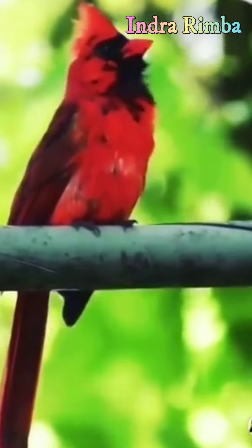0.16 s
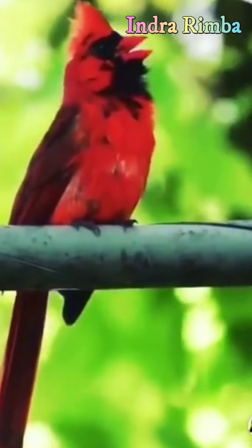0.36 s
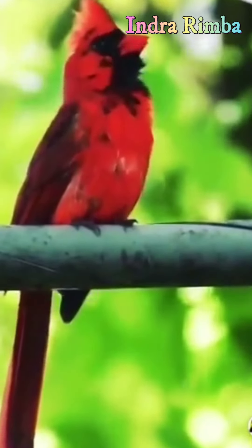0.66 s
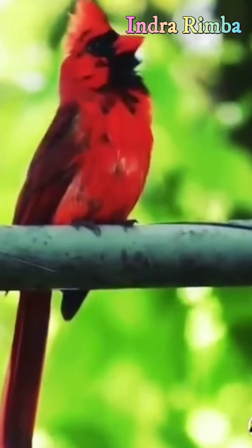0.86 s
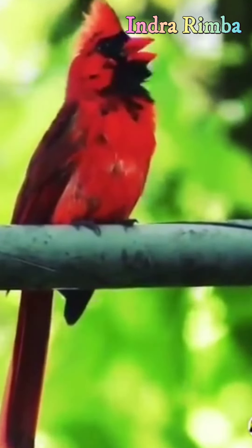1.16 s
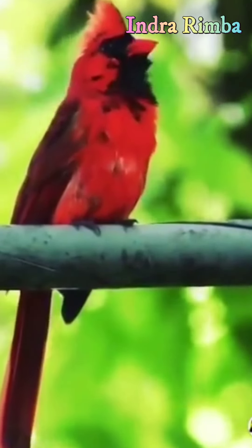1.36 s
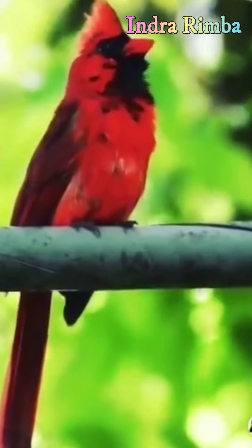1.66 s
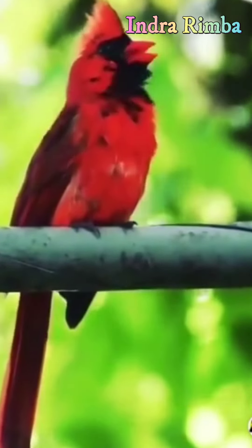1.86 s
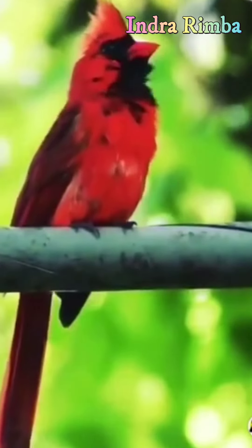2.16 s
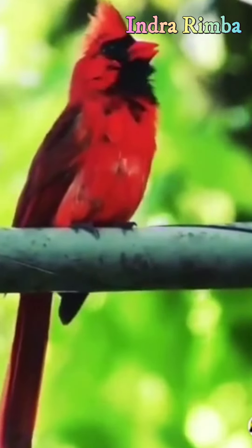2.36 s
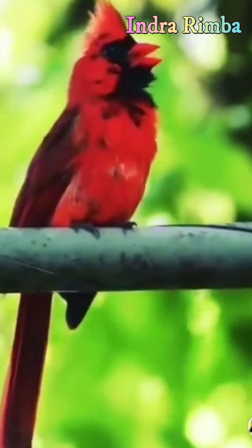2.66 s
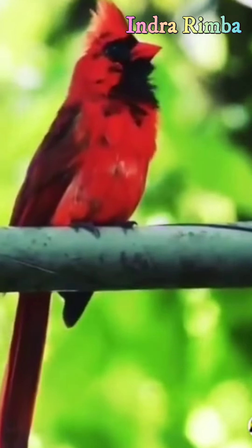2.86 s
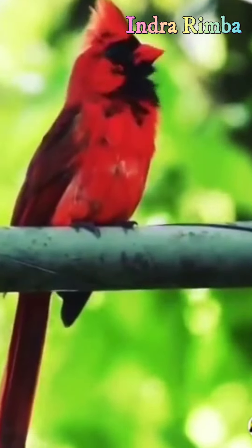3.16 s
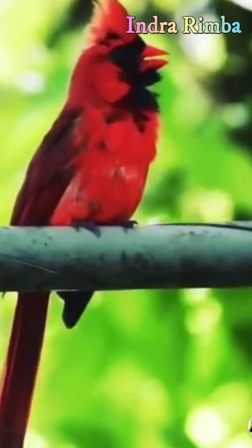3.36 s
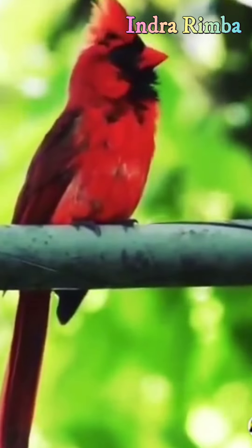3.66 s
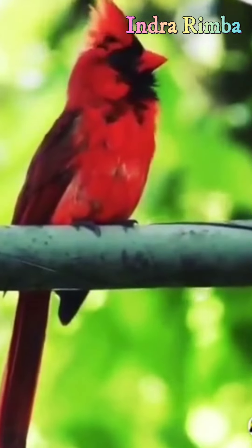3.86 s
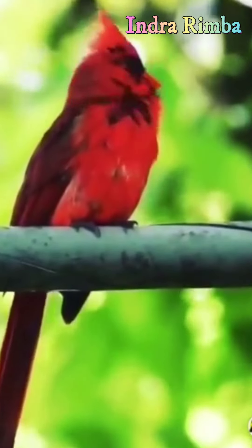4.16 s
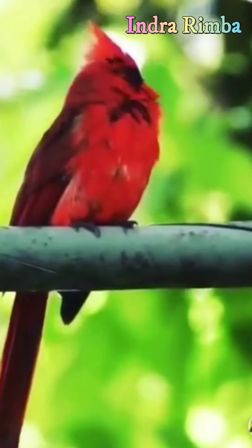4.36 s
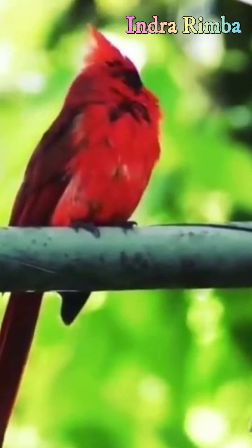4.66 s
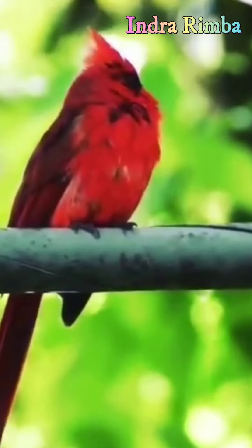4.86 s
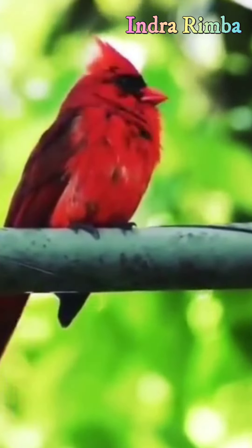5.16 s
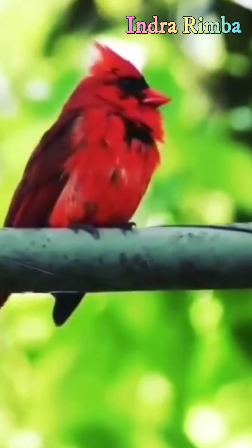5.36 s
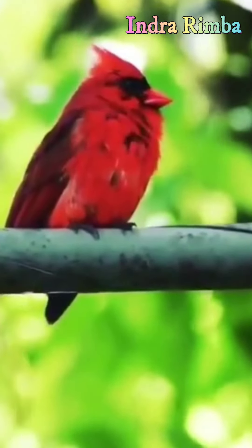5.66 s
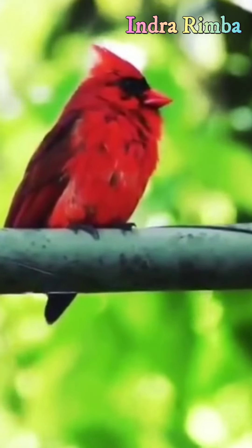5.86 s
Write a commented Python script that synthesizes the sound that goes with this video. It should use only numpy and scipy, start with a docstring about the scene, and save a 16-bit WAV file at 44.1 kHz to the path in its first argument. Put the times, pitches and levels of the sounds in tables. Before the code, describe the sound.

Loud clear bird whistles, first sweeping down, then repeatedly flicking upward, stop after four seconds, leaving buffeting wind and faint distant chirps outdoors.

```python
"""Cardinal song in a windy garden

A cardinal sings close by: four steep down-slurs, then seven rising whistles, with a low whistle between each pair.
Each note is a near sine with a gliding pitch; leaves and walls scatter it, and a thin noise sizzle rides on it.
Other birds call far off as blurred glides. Gusts of low noise and single pressure swings buffet the microphone.
A soft outdoor wash of slowly changing noise bands lies under it all."""
import sys
import numpy as np
from scipy import signal
from scipy.fft import rfft, irfft, next_fast_len
from scipy.io import wavfile
from scipy.ndimage import uniform_filter1d

SR = 44100
rng = np.random.default_rng(int(sys.argv[2]) if len(sys.argv) > 2 else 0)


def inscribe(sig):
    """Save sig as 16-bit PCM at rate SR to the path in sys.argv[1].

    A 1-D sig is mono; a 2-D sig holds one channel per row.
    Samples are clipped to [-1, 1] before scaling.
    """
    pcm = np.round(np.clip(np.atleast_2d(sig).T, -1, 1) * 32767)
    wavfile.write(sys.argv[1], SR, pcm.astype(np.int16))


N = 265349
T = np.arange(N) / SR   # time of every sample, s

# Sizzle columns below are settings for the loudest moment of a note, before smoothing and flicker.
# down-slurs: (knee t/s, dive before it t/s, length after it t/s, base pitch f/Hz, sag/Hz per s,
#              opening level/dB, closing level/dB, sizzle level/dB)
SLURS = [(.083, .004, 0.093, 4013, 12500, -29, -28.5, -44),
         (0.667, .011, 0.099, 3950, 13600, -24, -34.5, -40),
         (1.108, 0.015, 0.093, 4150, 14200, -21.5, -30.5, -34.5),
         (1.526, 0.015, 0.088, 3997, 13200, -19, -30.5, -35.5)]
DIVE_HZ_PER_S, DIVE_SWELL_DB_PER_S = 330000, 1704   # a slur swells as it dives in from above
KNEE_HZ, KNEE_S = 822, 0.013   # the dive eases into the steady sag
KNEE_DIP_DB, KNEE_DIP_AT_S, KNEE_DIP_WIDTH_S = -5.5, 0.0077, 0.003   # the level dips just after the knee
DROP_HZ_PER_S, DROP_S = 37500, 0.019   # the pitch collapses at the end

# arched low whistles: (start t/s, length t/s, time to the top t/s, held until t/s, top f/Hz, sag/Hz per s,
#                       level/dB, sizzle level/dB)
ARCHES = [(0.374, 0.169, 0.018, 0.14, 2540, 5290, -27.5, -52.5),
          (0.849, 0.17, 0.023, 0.12, 1807, 1990, -29.5, -52),
          (1.271, 0.15, 0.014, 0.11, 1851, 2730, -28.5, -53),
          (1.681, 0.14, 0.041, 0.099, 1774, 3380, -26.5, -53.5),
          (2.052, 0.17, 0.039, 0.09, 1752, 3700, -28.5, -48.5),
          (2.421, 0.13, 0.037, 0.064, 1710, 4980, -25.5, -45),
          (2.799, .15, 0.0427, 0.073, 1690, 2880, -24.5, -44.5),
          (3.202, 0.14, 0.037, 0.059, 1667, 4010, -26, -48),
          (3.572, .15, 0.05, 0.081, 1713, 4350, -26, -48.5),
          (3.976, 0.13, 0.041, 0.069, 1668, 5030, -30.5, -50)]
ARCH_LIFT, ARCH_SWELL_DB, ARCH_ROUND_S = 0.078, 16, 0.0264   # pitch (share) and level climb to a rounded top
ARCH_TAIL_DB, ARCH_RELEASE_S = -9.5, 0.0082   # after the hold the whistle sinks to a soft tail
ARCH_FADE_DB_PER_S = 27   # and the tail fades on

# rising whistles: (start t/s, length t/s, opening pitch factor, closing pitch factor, closing flick f/Hz,
#                   upstroke level/dB, crest level/dB, crest at share of the length, opening sizzle level/dB)
RISES = [(1.88, 0.12, 1.007, 1.033, 6, -20, -23, .74, -39),
         (2.25, 0.11, 1.018, 1.03, -5, -18.5, -21.5, 0.78, -43),
         (2.61, 0.11, 1.0, 1.027, 80, -22, -22, 0.77, -41.5),
         (3.004, 0.12, 0.97, 1.029, -7, -23, -21.5, 0.76, -45.5),
         (3.392, .12, .99, .985, 21, -22, -22, 0.68, -43.5),
         (3.785, 0.11, 1.036, .945, 327, -23, -21.5, 0.74, -49.5),
         (4.175, 0.11, 1.02, 0.94, 330, -22.5, -21.5, 0.81, -50.5)]
# their common climb, before the pitch factors: (share of the length, f/Hz)
RISE_PITCH = [(-.15, 1822), (-.06, 2038), (0.031, 2118), (0.189, 2513), (0.299, 2720), (.5, 2880),
              (.78, 3092), (1, 3114)]
UPSTROKE_AT, UPSTROKE_WIDTH, CREST_WIDTH = 0.077, 0.1, 0.25   # two swells, in shares of the length
RISE_SOFT_DB, FLICK_SHARE = -42, 0.145   # level outside the swells; last share of the note, where it flicks
RISE_SIZZLE_FADE_DB = -5.5   # change of the sizzle setting over the length of the note

# second harmonic against the whistle (dB)
OCTAVE_DB = -41
# noise colour of the sizzle on down-slurs, low whistles and rises; only the shape counts: (f/Hz, level/dB per Hz)
SLUR_SIZZLE = [(4500, -6), (6000, 2), (7700, 1.5), (9400, -4), (10400, -5), (11300, -19), (12500, 7.5),
               (13500, -8), (15500, -12)]
LOW_SIZZLE = [(6500, -18), (8000, -0.5), (8800, -3), (10200, -4), (10700, 8), (11500, 3.5), (12900, -4),
              (13500, -15), (15000, -44)]
RISE_SIZZLE = [(6800, -53), (8000, 18.5), (8600, 13.5), (9800, 11.5), (11000, 11.5), (13000, 4), (14200, 0),
               (15500, -32)]

# near reflections against the direct sound: (delay t/s, level/dB)
ECHOES = [(.0052, -10.5), (.011, -12.5), (.034, -31), (.052, -34.5)]
# tone colour that the foliage gives to scattered sound: (f/Hz, level/dB)
SCATTER = [(1000, -1), (1700, 1), (2250, 1), (2800, 4), (3400, 7.5), (5000, 5), (8000, 2), (14000, -6)]

# calls of far birds, before a common lift: (start t/s, length t/s, opening f/Hz, closing f/Hz, level/dB)
FAR_CALLS = [(0.79, 0.17, 2714, 2710, -55), (3.675, 0.12, 2620, 2710, -58), (4.009, .16, 2530, 2825, -55.5),
             (4.408, 0.13, 2690, 2620, -53.5), (4.608, 0.042, 4090, 3760, -58.5),
             (4.896, 0.031, 4200, 3720, -61), (5.3, 0.072, 2240, 2440, -71),
             (5.487, 0.063, 2205, 2570, -62), (5.717, 0.051, 2320, 2600, -60)]

# hardest eddies that strike the microphone, before the low cut: (centre t/s, peak level/dB, centre f/Hz)
BUFFETS = [(0.29, -18, 232), (2.066, -13, 413), (2.128, -13.5, 415), (2.252, -14.5, 395), (3.496, -12, 207),
           (3.69, -16.5, 421), (3.807, -15, 266), (3.829, -15.5, 303), (4.321, -11.5, 378),
           (4.612, -12, 268), (4.926, -12, 267), (5.211, -19, 302), (5.277, -12, 277), (5.327, -12, 334),
           (5.527, -17.5, 327), (5.599, -14, 530), (5.644, -18.5, 480), (5.819, -11.5, 435),
           (5.83, -12.5, 334), (5.856, -16, 295), (5.924, -15, 290)]
# separate gusts, as wind strength: (start t/s, length t/s, level/dB)
GUSTS = [(2.046, 0.12, -29), (2.478, 0.031, -32.5), (2.919, 0.11, -34), (3.093, 0.072, -34),
         (3.376, 0.029, -28), (3.479, 0.072, -31), (3.652, 0.046, -29), (3.794, 0.034, -22.5),
         (3.893, 0.079, -29.5), (4.116, 0.015, -34), (4.259, 0.11, -31.5), (4.319, 0.058, -25),
         (4.597, 0.057, -28), (4.684, 0.029, -37), (4.855, .12, -30.5), (5.326, 0.025, -28),
         (5.38, 0.1, -34), (5.614, 0.18, -28.5), (5.828, 0.043, -22.5), (5.89, 0.097, -30)]
GUST_ATTACK_S, GUST_RELEASE_S = 0.018, 0.017
# light breeze under the gusts, as wind strength: (t/s, level/dB)
BREEZE = [(0, -48.5), (.2, -39), (.5, -39.5), (.85, -55.5), (1.3, -45), (1.9, -39.5), (2.35, -38.5),
          (2.8, -43.5), (3.2, -40), (4.2, -45.5), (5.1, -39.5), (6, -37.5)]
# noise colours of strong gusts and plain wind; only the shape counts: (f/Hz, level/dB per Hz)
SQUALL = [(60, -47), (130, -32), (250, 0.5), (450, -4), (700, -14), (1100, -25.5), (1700, -35), (3000, -56),
          (10000, -82)]
WIND = [(20, -30), (50, -17.5), (100, -4), (160, 2), (240, 2.5), (350, -4), (500, -9), (800, -25.5),
        (1300, -34), (2500, -71), (10000, -85)]

# noise colour of the garden wash; only the shape counts: (f/Hz, level/dB per Hz)
GARDEN = [(30, -17), (120, 7.5), (350, -12), (550, 4.5), (900, 3.5), (1400, -2), (2000, -5), (2800, -4),
          (4000, -4.5), (5000, -10.5), (6600, -13.5), (8000, -20), (10000, -27), (15000, -36)]
GARDEN_DB = -44.5

CUTOFF_HZ = 15700


def from_db(db):
    """Turn decibels into a factor for the wave."""
    return 10 ** (np.asarray(db) / 20)


def rms_one(x):
    """Scale a signal to an average (RMS) strength of 1."""
    return x / np.sqrt(np.mean(x ** 2) + 1e-20)


def colour(x, spectrum):
    """Make each frequency louder or softer, following a spectrum of (Hz, dB) points."""
    hz, db = np.transpose(spectrum)
    size = next_fast_len(len(x) + 4096)
    f = np.maximum(np.fft.rfftfreq(size, 1 / SR), 1)
    gain = from_db(np.interp(np.log(f), np.log(hz), db))
    return irfft(rfft(x, size) * gain, size)[:len(x)]


def noise(spectrum):
    """Random noise with the given colour and an RMS of 1."""
    return rms_one(colour(rng.standard_normal(N), spectrum))


def drift(rate):
    """A random wander of spread 1: straight lines between random points, rate points a second."""
    knots = rng.standard_normal(8192)
    return rms_one(np.interp(T * rate, np.arange(len(knots)), knots))


def cardinal(gesture, notes, sizzle_spectrum, response, ghost_db, flutter_db,
             ghost_shift_hz=7650, linger_s=0.062, linger_share=0.24, flicker_db=1.5):
    """One kind of note with its weak octave, its sizzle and a faint copy of the whistle high in the treble."""
    tone, sizzle = whistles(gesture, notes, flutter_db)
    octave = from_db(OCTAVE_DB) * np.abs(tone) * np.exp(2j * np.angle(tone))
    heard = signal.fftconvolve(tone + octave, response)[:N]
    # turning the complex wave faster moves every frequency up by the same number of Hz
    ghost = from_db(ghost_db) * heard * np.exp(2j * np.pi * ghost_shift_hz * T)

    # the sizzle swells softly, flickers, and dies away with the scattered song
    power = uniform_filter1d(sizzle, size=1000) ** 2 + 1e-18
    keep = np.exp(-1 / (linger_s * SR))
    lingering = signal.lfilter([1 - keep], [1, -keep], power)
    power = (1 - linger_share) * power + linger_share * lingering
    flicker = from_db(flicker_db * drift(70))
    hiss = np.sqrt(power) * flicker * noise(sizzle_spectrum)
    return heard.real + ghost.real + hiss


def whistles(gesture, notes, flutter_db, sizzle_power=0.35):
    """The syrinx gives a near sine that follows the gesture; returns the tone and the strength of its sizzle."""
    tone, sizzle = np.zeros(N, complex), np.zeros(N)
    unsteady = 1 + 0.005 * drift(250)
    flutter = flutter_db * drift(80)
    for note in notes:
        start, hz, db, sizzle_db = gesture(*note)
        at = round(start * SR) + np.arange(len(hz))
        # the vibration takes a few milliseconds to start and to stop
        fade = signal.windows.tukey(len(at), 0.008 * SR / len(at))
        level = from_db(db + flutter[at]) * fade
        phase = 2 * np.pi * np.cumsum(hz * unsteady[at]) / SR
        tone[at] += np.sqrt(2) * level * np.exp(1j * phase)
        sizzle[at] += from_db(sizzle_db) * (level / level.max()) ** sizzle_power
    return tone, sizzle


def slur(knee, dive_s, length, pitch_hz, sag, open_db, close_db, sizzle_db):
    """A dive from high above eases into a steady fall, mostly fading as it goes, and ends in a quick drop."""
    age = np.arange(-dive_s, length, 1 / SR)
    before, after = np.maximum(-age, 0), np.maximum(age, 0)
    ending = np.maximum(age - length + DROP_S, 0)
    dive = DIVE_HZ_PER_S * before
    easing = KNEE_HZ * np.exp(-after / KNEE_S)
    hz = pitch_hz + dive + easing - sag * after - DROP_HZ_PER_S * ending
    db = np.interp(age, [0, length], [open_db, close_db]) - DIVE_SWELL_DB_PER_S * before
    dip = KNEE_DIP_DB * np.exp(-((age - KNEE_DIP_AT_S) / KNEE_DIP_WIDTH_S) ** 2)
    return knee - dive_s, hz, db + dip, sizzle_db


def rise(start, length, open_pitch, close_pitch, flick_hz, upstroke_db, crest_db, crest_at, sizzle_db):
    """One climb that flattens towards its top and swells twice, in a quick upstroke and a broad crest."""
    knot_share, knot_hz = np.transpose(RISE_PITCH)
    share = np.arange(knot_share[0], 1, 1 / (length * SR))
    hz = np.interp(share, knot_share, knot_hz) * np.linspace(open_pitch, close_pitch, len(share))
    hz = hz + flick_hz * np.maximum(1 - (1 - share) / FLICK_SHARE, 0)
    upstroke = from_db(upstroke_db) * np.exp(-((share - UPSTROKE_AT) / UPSTROKE_WIDTH) ** 2)
    crest = from_db(crest_db) * np.exp(-((share - crest_at) / CREST_WIDTH) ** 2)
    level = from_db(RISE_SOFT_DB) + upstroke + crest
    # the first share is below 0, so the sound begins a little before the listed start
    return start + length * share[0], hz, 20 * np.log10(level), sizzle_db + RISE_SIZZLE_FADE_DB * share


def arch(start, length, top_s, hold_s, top_hz, sag, level_db, sizzle_db):
    """Pitch and level climb to a top; then the pitch sags while the level holds and sinks to a soft tail."""
    age = np.arange(0, length, 1 / SR)
    to_climb = np.maximum(1 - age / top_s, 0) ** 2
    rounded_age = np.hypot(np.maximum(age - top_s, 0), ARCH_ROUND_S) - ARCH_ROUND_S
    hz = top_hz * (1 - ARCH_LIFT * to_climb) - sag * rounded_age
    released = np.maximum(age - hold_s, 0)
    tail_db = ARCH_TAIL_DB * (1 - np.exp(-released / ARCH_RELEASE_S)) - ARCH_FADE_DB_PER_S * released
    return start, hz, level_db - ARCH_SWELL_DB * to_climb + tail_db, sizzle_db


def garden_response(near_db, near_t60, far_db, far_t60, build_s=0.017, grain_db=-3.0):
    """Direct sound, a few reflections, quick uneven scatter from near leaves and a faint long tail from the trees."""
    t = T[:SR]
    response = np.zeros(SR)
    for db, t60 in ((near_db, near_t60), (far_db, far_t60)):   # t60: seconds to fall by 60 dB
        decay = from_db(grain_db * drift(289.3)[:SR] - 60 * t / t60)
        tail = rng.standard_normal(SR) * decay * (1 - np.exp(-t / build_s))
        response += from_db(db) * tail / np.linalg.norm(tail)
    response = colour(response, SCATTER)
    response[0] += 1   # the direct sound
    for delay, db in ECHOES:
        response[round(delay * SR)] += from_db(db)
    return response


def far_birds(lift_db=12.0, waver=0.0081):
    """Unsteady sine glides, blurred by distance."""
    calls, unsteady = np.zeros(N), 1 + waver * drift(200)
    for start, length, open_hz, close_hz, db in FAR_CALLS:
        at = np.flatnonzero((T >= start) & (T < start + length))
        hz = np.linspace(open_hz, close_hz, len(at)) * unsteady[at]
        phase = 2 * np.pi * np.cumsum(hz) / SR
        calls[at] += from_db(db + lift_db) * signal.windows.tukey(len(at)) * np.sin(phase)
    distant = garden_response(near_db=-7, near_t60=0.35, far_db=-13, far_t60=0.9)
    return signal.fftconvolve(calls, distant)[:N]


def buffets():
    """A single eddy is a short push and pull of pressure, about one cycle long."""
    out = np.zeros(N)
    turns = rng.uniform(0, 2 * np.pi, len(BUFFETS))
    for (centre, db, hz), turn in zip(BUFFETS, turns):
        at = np.flatnonzero(np.abs(T - centre) < 0.02)
        cycles = (T[at] - centre) * hz
        swell = 1 / np.cosh(3.4 * cycles)
        out[at] += from_db(db) * swell * np.cos(2 * np.pi * cycles + turn)
    low_cut = signal.butter(2, 80, "high", fs=SR, output="sos")
    return signal.sosfilt(low_cut, out)


def wind(level_db=-1.0, lumpy_db=5.5, calm_db=-50, squall_db=-9, strong_db=-28):
    """Lumpy low turbulence that vanishes in the lulls and grows brighter in strong gusts."""
    level = wind_strength()
    level = level * level ** 2 / (level ** 2 + from_db(calm_db) ** 2)   # hush the lulls
    lumps = from_db(lumpy_db * np.clip(drift(160), -2, 1.6))
    eddies = rng.standard_normal((2, N)) * lumps
    plain = from_db(level_db) * rms_one(colour(eddies[0], WIND))
    brightness = from_db(squall_db) * np.sqrt(level / from_db(strong_db))
    return level * (plain + brightness * rms_one(colour(eddies[1], SQUALL)))


def wind_strength():
    """A slowly changing breeze, and on it gusts that rise quickly, hold and die away."""
    power = from_db(np.interp(T, *np.transpose(BREEZE))) ** 2
    for start, length, db in GUSTS:
        to_come = np.maximum(start - T, 0) / GUST_ATTACK_S
        gone = np.maximum(T - start - length, 0) / GUST_RELEASE_S
        gust = from_db(db) * np.exp(-np.minimum(to_come + gone, 20))
        power = power + gust ** 2
    return np.sqrt(power)


def wash(patchy_db=3.0, rate=14.0, count=40):
    """Far leaves and open air: soft noise whose narrow bands swell and fade on their own."""
    edges, out = np.geomspace(40, 15000, count + 1), np.zeros(N)
    sources = noise(GARDEN), noise(GARDEN)   # neighbouring bands get unrelated noise
    for k, band in enumerate(zip(edges, edges[1:])):
        band_filter = signal.butter(2, band, "band", fs=SR, output="sos")
        out += signal.sosfilt(band_filter, sources[k % 2]) * from_db(patchy_db * drift(rate))
    return from_db(GARDEN_DB) * rms_one(out)


def scene():
    """The near song, the far birds, the wind and the garden at one microphone."""
    response = garden_response(near_db=-12, near_t60=0.27, far_db=-17, far_t60=0.95)
    slurs = cardinal(slur, SLURS, SLUR_SIZZLE, response, ghost_db=-25, flutter_db=2.5)
    rises = cardinal(rise, RISES, RISE_SIZZLE, response, ghost_db=-32, flutter_db=1.3)
    arches = cardinal(arch, ARCHES, LOW_SIZZLE, response, ghost_db=-27.5, flutter_db=0.4)
    song = slurs + rises + arches
    return (song + far_birds() + buffets() + wind() + wash())[None]


def record(dry):
    """A steep low-pass filter removes the highest treble."""
    steep_cut = signal.ellip(10, 0.1, 80, CUTOFF_HZ, fs=SR, output="sos")
    return signal.sosfilt(steep_cut, dry)


dry = scene()
out = record(dry)
inscribe(out)
```